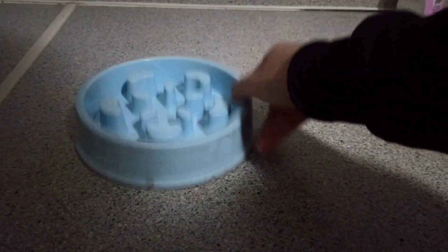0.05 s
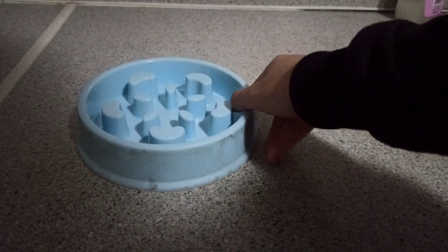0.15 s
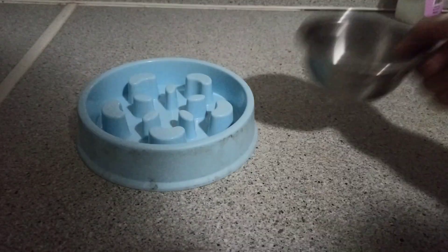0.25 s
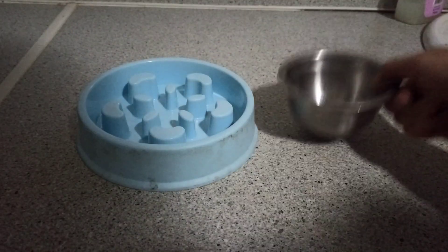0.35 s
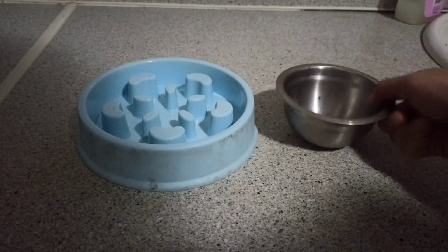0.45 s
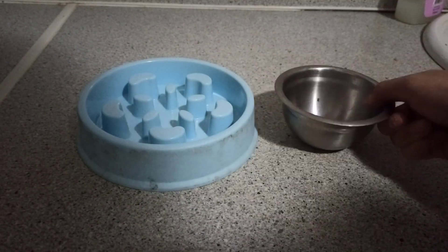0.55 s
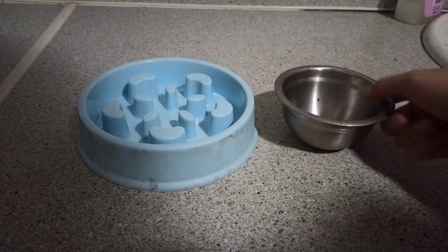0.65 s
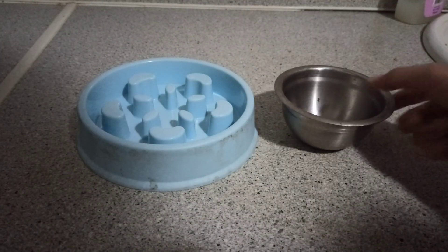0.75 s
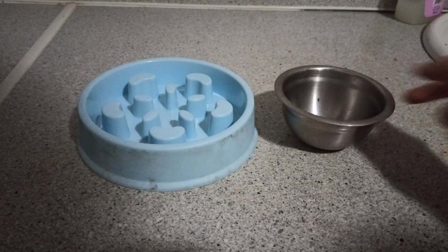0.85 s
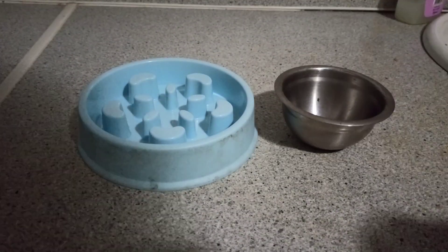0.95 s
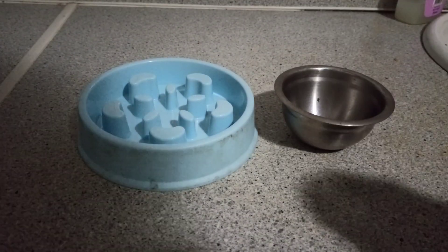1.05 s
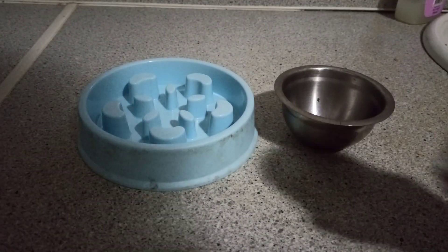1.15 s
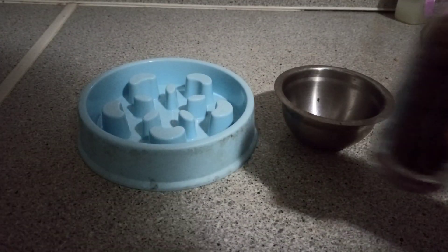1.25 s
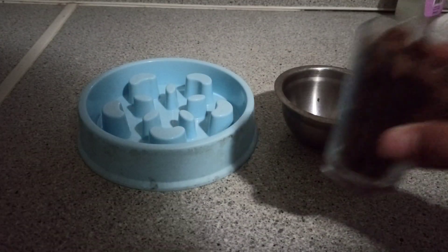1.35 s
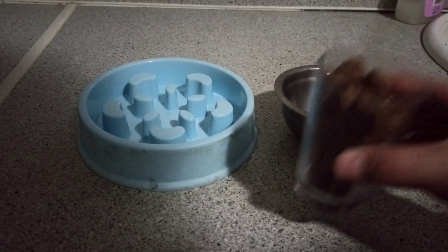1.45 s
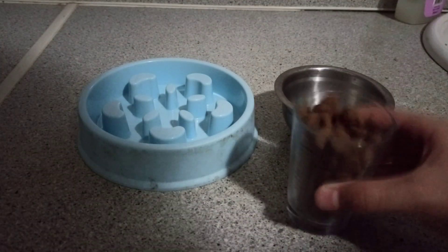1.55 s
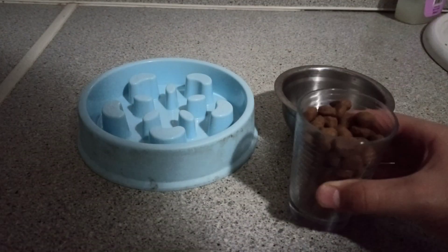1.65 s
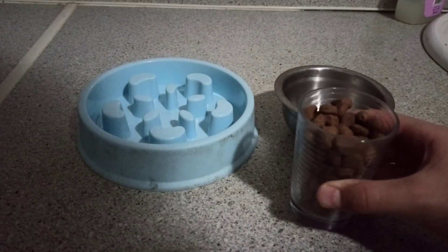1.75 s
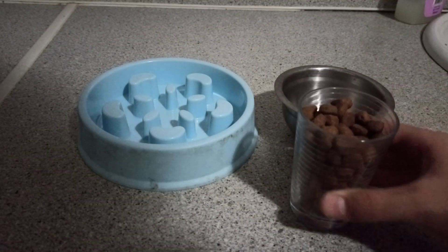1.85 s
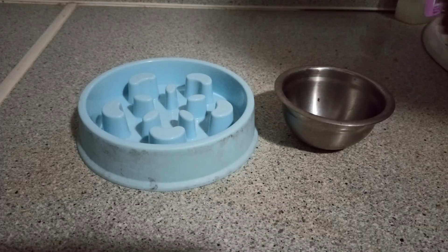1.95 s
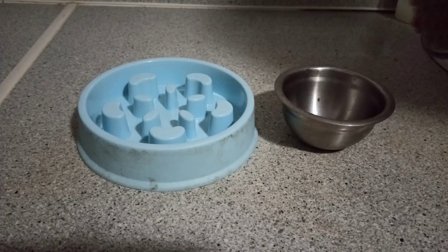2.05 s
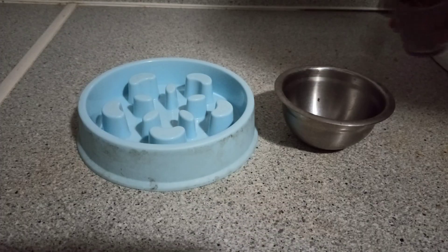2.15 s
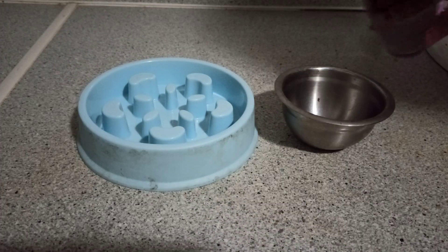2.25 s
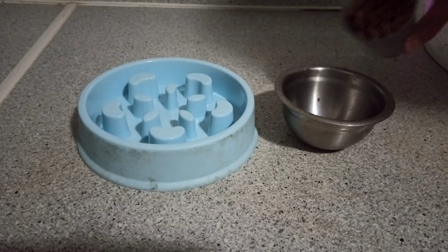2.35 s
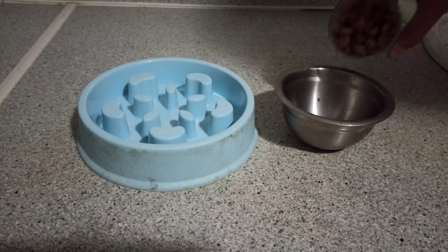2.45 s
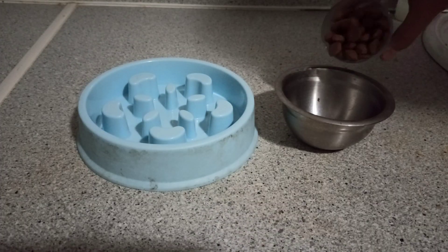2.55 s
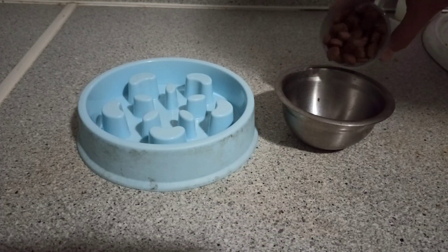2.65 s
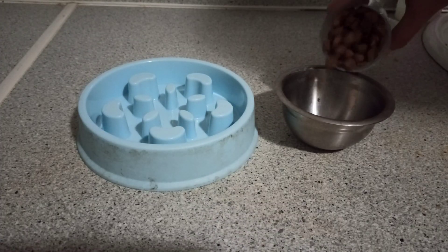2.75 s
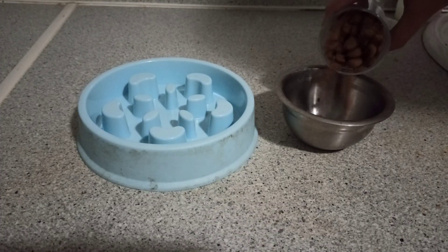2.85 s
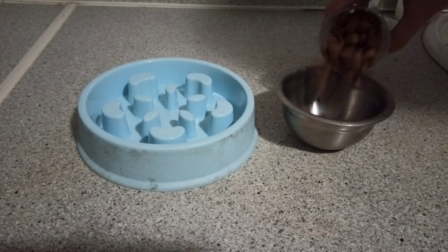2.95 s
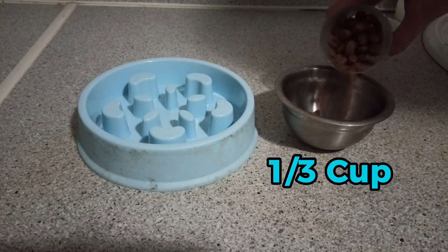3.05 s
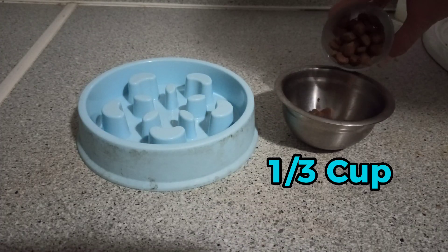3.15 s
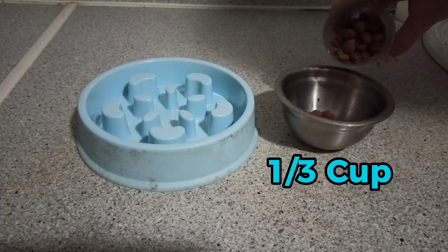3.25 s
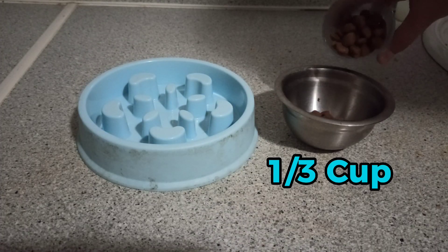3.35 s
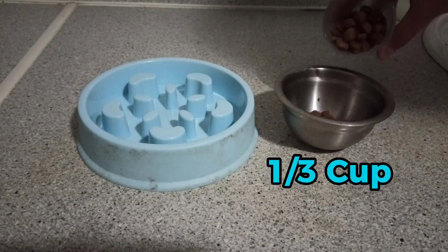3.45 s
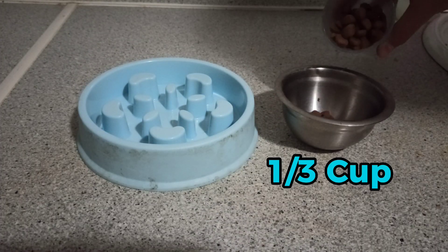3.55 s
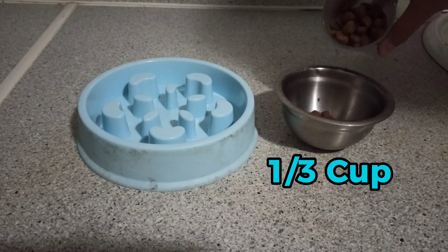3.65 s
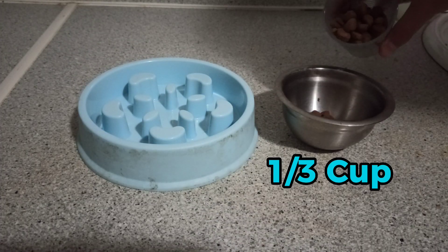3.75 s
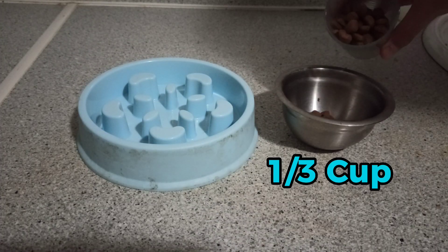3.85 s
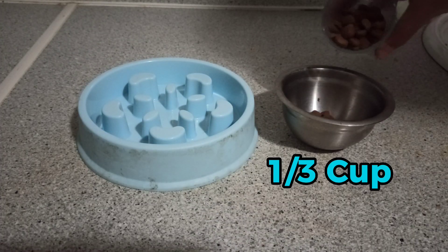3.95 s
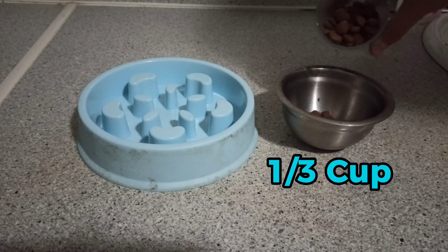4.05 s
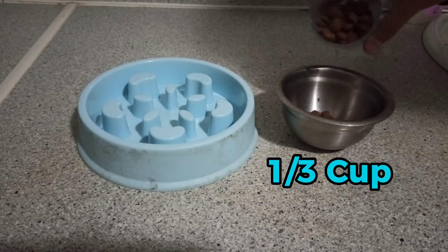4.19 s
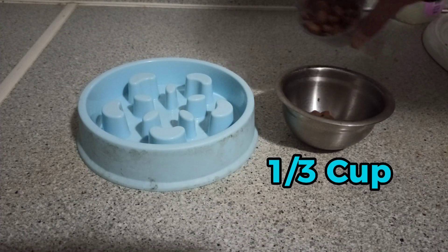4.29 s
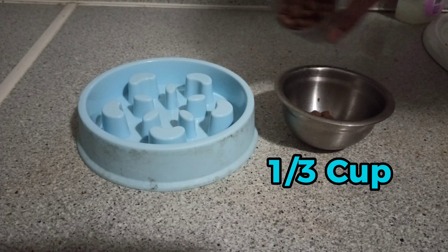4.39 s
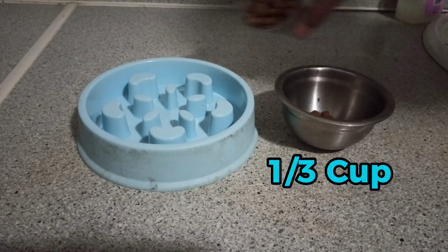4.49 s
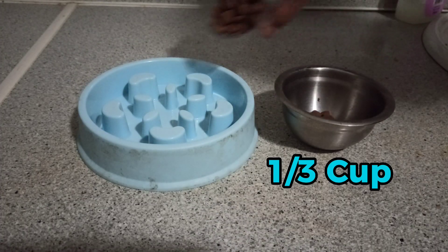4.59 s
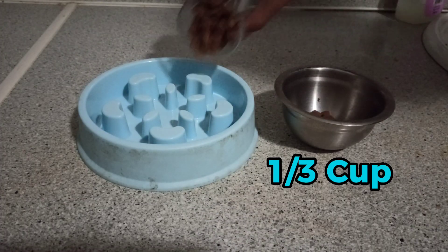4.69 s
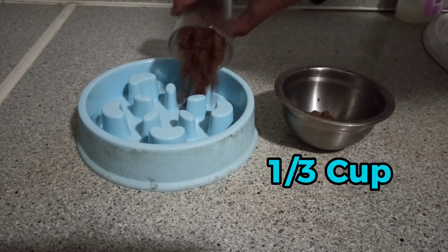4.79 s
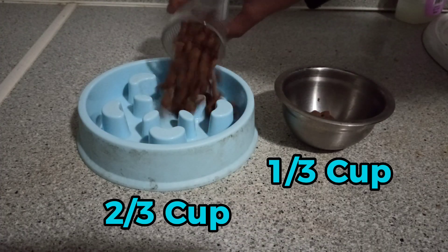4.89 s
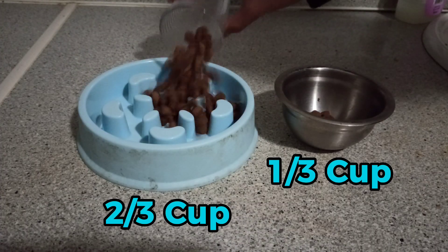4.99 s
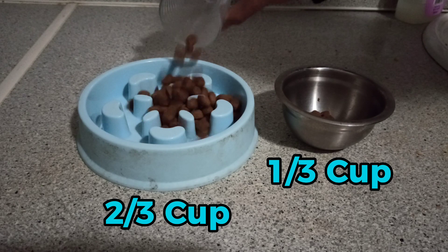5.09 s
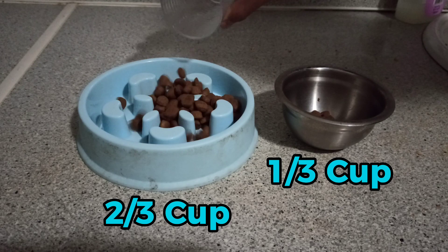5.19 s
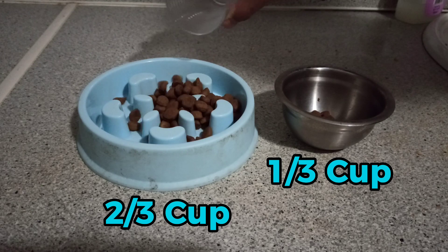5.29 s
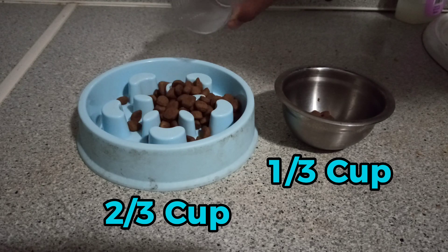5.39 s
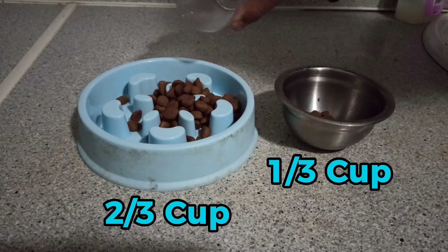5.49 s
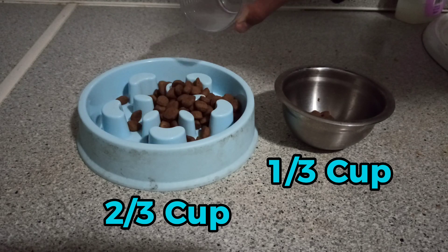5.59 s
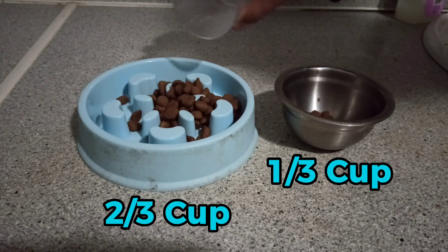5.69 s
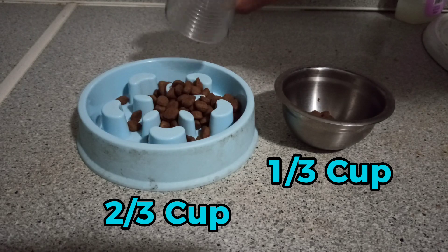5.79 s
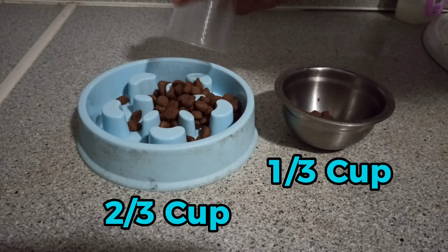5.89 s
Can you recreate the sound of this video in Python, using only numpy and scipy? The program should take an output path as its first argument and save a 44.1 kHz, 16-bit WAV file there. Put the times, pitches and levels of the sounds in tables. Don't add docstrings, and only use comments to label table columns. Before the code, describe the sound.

Close stereo view of a hard, echoing kitchen with a low appliance hum. A plastic bowl clacks down, abruptly cut; a steel bowl lands with a ringing double knock; a full glass thuds. After a few faint ticks, dry pellets clatter brightly into the steel, pause, then pour densely over hollow plastic and settle.

```python
import sys
import numpy as np
from scipy import signal
from scipy.io import wavfile
from scipy.ndimage import uniform_filter1d

SR = 44100
rng = np.random.default_rng(int(sys.argv[2]) if len(sys.argv) > 2 else 0)


def persist_wave(psi):
    counts = np.round(np.clip(psi, -1, 1) * 32767).astype(np.int16)
    wavfile.write(sys.argv[1], SR, np.atleast_2d(counts).T)


def volts_from_decibels(level):
    exponent = np.asarray(level, float) / 20
    return 10 ** exponent


N = 261513

# [f/Hz, t60/s, echo level/dB, left-right likeness]
ROOM = [(100, 0.79, -14.5, 0.7), (238, 0.62, -7.5, 0.61), (534, 0.43, 2, 0.65), (1010, 0.38, -2.5, 0.75),
        (1800, 0.4, -5, 0.025), (3800, 0.37, -2, 0.06), (7760, 0.41, -3, 0.032), (13800, 0.22, -4.5, 0.05)]


def colour(x, low_hz, high_hz):
    return signal.sosfilt(signal.butter(2, [low_hz, high_hz], "band", fs=SR, output="sos"), x)


def rms_one(x):
    return x / np.sqrt(np.mean(x ** 2) + 1e-20)


def at_hz(table, hz, order=1):
    columns = np.array(table)
    return np.interp(np.log(hz), np.log(columns[:, 0]), columns[:, order])


def bands(length):
    edges_hz = 25 * 2 ** np.arange(0, 9.4, 1 / 3)
    white = rng.standard_normal((2, 2, length))
    for k, (low_hz, high_hz) in enumerate(zip(edges_hz, edges_hz[1:])):
        mid, side = colour(white[k % 2], low_hz, high_hz)
        hz = np.sqrt(low_hz * high_hz)
        alike = np.clip(at_hz(ROOM, hz, order=3), -1, 1)
        yield hz, np.sqrt(1 + alike) * mid + np.sqrt(1 - alike) * side * [[1], [-1]]


def ring(clicks, hz, t60_s):
    r, w = volts_from_decibels(-60 / (t60_s * SR)), 2 * np.pi * hz / SR
    return signal.lfilter([0, np.sin(w)], [1, -2 * r * np.cos(w), r * r], clicks + 1e-18)


def blows(rows, colour_db):
    bright_share = (0, .25, .75, 1)
    s, dull_db, bright_db, pan_db = np.transpose(rows)
    db = dull_db[:, None] + np.outer(bright_db - dull_db, bright_share) + np.asarray(colour_db)
    return np.column_stack([s, db, pan_db])


def pellets(rows, colour_db):
    rows = np.asarray(rows, float)
    return np.column_stack([rows[:, 0], rows[:, [1, 1, 2, 3]] + np.asarray(colour_db), rows[:, 4]])


def patter(curve, spread_db, colour_db, width_db):
    s, per_s, level_db = np.transpose(curve)
    t = np.arange(round(s[0] * SR), round(s[-1] * SR)) / SR
    happens = rng.random(len(t)) < np.interp(t, s, per_s) / SR
    bigness = np.minimum(rng.exponential(1, len(t)), 4)
    luck = rng.standard_normal((len(t), 5))
    db = np.interp(t, s, level_db) + spread_db * bigness
    band_db = db[:, None] + np.asarray(colour_db) + 5.6 * luck[:, :4]
    return np.column_stack([t, band_db, width_db * luck[:, 4]])[happens]


def strike(rows, modes, gain_db, crack_db, crack_ms, scatter_db, lag_ms, dull_db=0, firm=False):
    centre_hz = (400, 1200, 3000, 6300)
    crack_edges_hz = np.array([150, 700, 2000, 4500, 16000])
    rows = np.asarray(rows, float)
    start = round(rows[:, 0].min() * SR)
    span = min(N - start, round((np.ptp(rows[:, 0]) + 1.2) * SR))
    at = np.round(rows[:, 0] * SR).astype(int) - start
    pan = volts_from_decibels(np.outer([.5, -.5], rows[:, 5]))
    luck = rng.standard_normal((len(rows), len(modes), 2))
    sound = np.zeros((2, span))
    for k, (hz, level_db, t60_s) in enumerate(modes):
        place = np.interp(np.log(hz), np.log(centre_hz), np.arange(4))
        share = np.maximum(1 - np.abs(place - np.arange(4)), 0)
        sign = -(-1) ** k if firm else np.sign(luck[:, k, 1])
        strength = volts_from_decibels(rows[:, 1:5] @ share + level_db + scatter_db * luck[:, k, 0])
        clicks = np.zeros((2, span))
        clicks[:, at] = pan * strength * sign
        sound += ring(clicks, hz, t60_s)
    fade = np.exp(-1000 / (crack_ms * SR))
    rise = np.exp(-1000 / (.3 * SR))
    poles = np.convolve([1, -fade], [1, -rise])
    mid, side = rng.choice([-1., 1.], (2, span))
    grit = mid + 1.2 * side * [[1], [-1]]
    for k, (low_hz, high_hz) in enumerate(zip(crack_edges_hz, crack_edges_hz[1:])):
        clicks = np.zeros((2, span))
        clicks[:, at] = pan * volts_from_decibels(rows[:, k + 1] + crack_db + dull_db * (k < 2))
        envelope = signal.lfilter([1 - rise], poles, clicks + 1e-18)
        sound += colour(envelope * grit, low_hz, high_hz) * np.sqrt(SR / 2 / (high_hz - low_hz))
    out = np.zeros((2, N))
    out[:, start:start + span] = volts_from_decibels(gain_db) * sound
    out[0] = np.interp(np.arange(N) - lag_ms * SR / 1000, np.arange(N), out[0])
    return out


def lull(hz):
    spell = np.exp(-((np.arange(N) / SR - 4.3) / 0.27) ** 2)
    return -9 * np.exp(-np.log2(hz / 720) ** 2) * spell


def hum():
    # [f/Hz, density/dB per Hz]
    rumble = [(30, -33), (70, -22), (110, -16.5), (200, -20.5), (300, -19), (450, -24), (700, -16.5),
              (930, -23.5), (1050, -33), (2000, -37.5), (4200, -40), (5000, -47.5), (7000, -40),
              (13000, -38.5)]
    # [f/Hz, rms level/dB]
    motors = [(98.2, -57), (100.1, -84)]
    # [f/Hz, width/Hz, level/dB]
    whines = [(194.5, 22, -67.5), (278.3, 31, -71), (285, 18, -66.5), (337.4, 20, -66), (400, 14, -73),
              (496, 8.7, -65.5), (662, 79, -66), (1120, 2.9, -74), (1910, 8.5, -83.5), (2130, 32, -77),
              (3035, 15, -81.5), (4070, 610, -75.5), (6350, 290, -79)]
    rush = 0
    for hz, noise in bands(N):
        slack_db = lull(hz) if 300 < hz < 1600 else 0
        rush = rush + noise * volts_from_decibels(at_hz(rumble, hz) + slack_db)
    out = volts_from_decibels(-54.5) * rms_one(rush)
    for hz, level_db in motors:
        drone = np.sqrt(2) * np.sin(2 * np.pi * hz * np.arange(N) / SR)
        out = out + volts_from_decibels(level_db + np.array([[.8], [-.8]])) * drone
    for hz, width_hz, level_db in whines:
        r = np.exp(-np.pi * width_hz / SR)
        poles = [1, -2 * r * np.cos(2 * np.pi * hz / SR), r * r]
        once = signal.lfilter([1, 0, -1], poles, rng.standard_normal((2, N)))
        mid, side = signal.lfilter([1, 0, -1], poles, once)
        out = out + volts_from_decibels(level_db) * rms_one(mid + 0.23 * side * [[1], [-1]])
    return out


def knock(x):
    return colour(x, 130, 19000)


def plastic_down():
    # [t/s, thud/dB, clack/dB, tick/dB, left-right/dB]
    touches = [
        (0.0135, -17, -15, -11, 1),
        (0.0640, -36, -35, -34.5, 0.32),
    ]
    # [t/s, contacts per s, level/dB]
    roll = [
        (0.025, 300, -44),
        (0.07, 300, -41.5),
        (0.1, 300, -53.5),
        (0.126, 300, -32.5),
    ]
    # [t/s, thud/dB, clack/dB, tick/dB, left-right/dB]
    landing = [
        (0.1282, -18, -10.5, -11.5, 3.5),
        (0.1308, -21.5, -23, -14.5, 2),
        (0.1396, -25.5, -11, -22, -3),
        (0.1478, -30, -34.5, -32, -3),
    ]
    landing_db = (0.073, 0.1, 0.1, 0.078)
    # [f/Hz, level/dB, t60/s]
    edge_modes = [(362, -14, 0.1), (640, -5, 0.024), (887, 7, 0.021), (773, -12, .06), (1187, -9, .02),
                  (1820, -14, .006), (2700, -19, .008), (3130, -5, 0.017), (3910, -7, .008),
                  (4500, -8.5, 0.0086), (6200, -10, 0.016), (7500, -12.5, .01)]
    # [f/Hz, level/dB, t60/s]
    base_modes = [(260, -14.5, 0.076), (358, -14, 0.05), (558, 1, 0.031), (625, -9, 0.024),
                  (738, 3.5, 0.024), (1040, -1, 0.014), (1302, -3.5, 0.024), (1700, 0.5, 0.013),
                  (2640, -17.5, 0.0048), (3510, -25, .006), (4570, -32.5, .004), (6760, -14.5, 0.012),
                  (7560, -22.5, 0.008)]
    out = strike(pellets(touches, [0, 0, 0, 0]), edge_modes, 0, crack_db=1.5, crack_ms=0.49,
                 scatter_db=2.5, lag_ms=0.024, dull_db=-12.5, firm=True)
    out += strike(patter(roll, 2.75, [-10.5, 6.5, -8.5, 4], 3.3), edge_modes, 0, crack_db=-11,
                  crack_ms=1.0, scatter_db=5.0, lag_ms=0.1)
    out += strike(pellets(landing, landing_db), base_modes, 0, crack_db=-11.5, crack_ms=0.85,
                  scatter_db=5.0, lag_ms=-0.13, dull_db=4, firm=True)
    return knock(out)


def steel_down():
    # [t/s, dull/dB, bright/dB, left-right/dB]
    landing = [
        (0.435, -18.5, -21, 0.93),
        (0.4888, -19.5, -27, 0.13),
    ]
    landing_db = (-2.5, 14.5, -19.5, -2.5)
    # [f/Hz, level/dB, t60/s]
    base_modes = [(170, -9.5, .12), (258, -6.5, .14), (340, -6.5, .05), (465, -19, 0.015),
                  (641, 0.5, 0.0098), (750, -8.5, 0.032), (953, -11, 0.0089), (1270, 5, 0.0078),
                  (1520, -6.5, 0.0051), (2430, -3.5, 0.005), (3180, 20, .005), (6800, -17.5, .08),
                  (7610, -20, 0.072)]
    # [f/Hz, level/dB, t60/s]
    wall_rings = [(4545, -14, .2), (4656, 3, .36), (4680, 2, .22), (4718, 1, .22), (4752, -3, .14)]
    return knock(strike(blows(landing, landing_db), base_modes + wall_rings, 2.8, crack_db=7.5,
                        crack_ms=0.76, scatter_db=1, lag_ms=0.03, dull_db=-14, firm=True))


def glass_down():
    # [t/s, dull/dB, bright/dB, left-right/dB]
    landing = [
        (1.5976, -16, -13, 0.97),
    ]
    landing_db = (0.083, 0.1, 0.1, 0.1)
    # [f/Hz, level/dB, t60/s]
    base_modes = [(140.4, -18, 0.41), (185, -12, 0.092), (300, -12, 0.061), (426, -11, 0.02),
                  (735, -4.5, 0.026), (1050, 1.5, 0.01), (1460, 0.5, 0.013), (1920, 1.5, 0.0087),
                  (2430, -4, 0.012), (3610, -10.5, 0.006), (6400, -8.5, 0.009)]
    return knock(strike(blows(landing, landing_db), base_modes, 5.46, crack_db=-3, crack_ms=1.1,
                        scatter_db=5, lag_ms=0.066, dull_db=-7.5, firm=True))


def glass_pellets():
    # [t/s, dull/dB, bright/dB, left-right/dB]
    ticks = [
        (1.8083, -80, -66, -4),
        (1.8582, -84, -58.5, 2),
        (2.49, -75, -43, 0),
        (2.5208, -74, -66, -16),
        (2.8089, -53.5, -54, 0),
        (2.8537, -69.5, -48, -6),
    ]
    tick_db = (-12, -8, -1.5, -2)
    # [t/s, contacts per s, level/dB]
    slide = [
        (4.77, 704, -84),
        (4.805, 705, -75.5),
        (4.835, 704, -64.5),
        (4.85, 710, -68),
    ]
    # [f/Hz, level/dB, t60/s]
    wall_modes = [(2750, -14, 0.08), (2785, 3, 0.03), (3940, -16, .02), (6600, -22, .15), (6210, -6, .06),
                  (6260, 1, 0.035), (6840, -22, 0.032)]
    out = strike(blows(ticks, tick_db), wall_modes, 10.6, crack_db=-5.5, crack_ms=1.4,
                 scatter_db=-3.0, lag_ms=0.12)
    return out + strike(patter(slide, 2.3, [-15, -25.5, -0.5, -0.5], 2.0), wall_modes, 13.0,
                        crack_db=-19, crack_ms=1.2, scatter_db=2.0, lag_ms=0.12)


def steel_pour():
    # [t/s, thud/dB, clack/dB, tick/dB, left-right/dB]
    clear = [(2.8808, -19, -24, -11, -3), (2.884, -32.5, -35, -25.5, -9), (2.9261, -30.5, -20.5, -22, -4),
             (2.9347, -45.5, -22.5, -29.5, -0.5), (2.9646, -29.5, -42, -46, 0), (2.9831, -23, -16, -18, -1),
             (2.9909, -38, -25, -31, 2), (2.9988, -46, -25, -21, 1), (3.0039, -30, -25, -24.5, -3),
             (3.0114, -47, -25, -49, -4), (3.0167, -36.5, -29, -38, 0), (3.0224, -53.5, -44, -34, 5),
             (3.0525, -35.5, -54, -40.5, -5), (3.0886, -36, -33, -37, 9), (3.0967, -56, -27, -24.5, -12),
             (3.1045, -37, -31, -31, 22), (3.1162, -40, -22.5, -16, 1), (3.1223, -25.5, -20, -29, -3),
             (3.1384, -55.5, -37, -42, 1), (3.1468, -29.5, -32, -38, 5), (3.1633, -31.5, -29, -48, -1),
             (3.1724, -46, -43, -45, 8), (3.1925, -39, -44, -53, -1), (3.2015, -54, -53, -39, 2),
             (3.2393, -36, -33, -32.5, 0), (3.257, -38, -34, -46, 6), (3.284, -45, -45, -40.5, -6),
             (3.3849, -39, -39, -40.5, 3), (3.4021, -57, -59, -68, -2)]
    clear_db = (-2.5, 6, -2.5, 3)
    # [t/s, contacts per s, level/dB]
    small = [
        (2.88, 540, -68),
        (2.928, 350, -60),
        (3.004, 370, -43),
        (3.052, 450, -50),
        (3.114, 380, -39),
        (3.45, 440, -61.5),
    ]
    # [f/Hz, level/dB, t60/s]
    clank = [(630, -6.5, .015), (1230, -5.5, 0.013), (1880, -20.5, .01), (2407, -7, .02),
             (2626, -10, 0.0222), (2900, -3, 0.044), (3325, -5, 0.017), (4250, -12.5, .025),
             (4725, 3.5, .014), (6450, -11, .012), (8290, 1, .035)]
    # [f/Hz, level/dB, t60/s]
    rings = [(4533, -10, .05), (4617, -10, .07), (4638, -9, .09), (4677, -7, .06), (6718, -13, .18),
             (7011, -16, .06), (7404, -12, .17), (7607, -9, .19)]
    filled_s, empty_shine_db, filled_ring = 2.9, 3, .35
    rows = pellets(clear, clear_db)
    bare = [(hz, db + empty_shine_db * (hz > 7500), t60_s) for hz, db, t60_s in clank + rings]
    loaded = [(hz, db, min(t60_s, .02 + filled_ring * t60_s)) for hz, db, t60_s in clank + rings]
    out = strike(rows[rows[:, 0] < filled_s], bare, -2.0, crack_db=5.5, crack_ms=0.61,
                 scatter_db=2.5, lag_ms=0.09, dull_db=-17.5)
    out += strike(rows[rows[:, 0] >= filled_s], loaded, 1.75, crack_db=2.5, crack_ms=1.08,
                  scatter_db=1.5, lag_ms=0.038, dull_db=-5.5)
    return out + strike(patter(small, 1.7, [4.5, -9.0, -11, -27], 3.2), loaded, 1.45,
                        crack_db=-10.5, crack_ms=0.44, scatter_db=2.0, lag_ms=0.032)


def rim_pings():
    # [t/s, dull/dB, bright/dB, left-right/dB]
    pings = [
        (3.163, -39, -62.5, -7),
        (3.181, -80, -36.5, -10),
    ]
    ping_db = (-8, 6.5, 7.5, -7.5)
    # [f/Hz, level/dB, t60/s]
    rim_modes = [(1115.5, -2, 1.5), (1123.5, -3, 1.5), (2997, -1.5, .95)]
    return strike(blows(pings, ping_db), rim_modes, 0, crack_db=-25, crack_ms=1.5, scatter_db=0, lag_ms=.3)


def plastic_pour():
    # [t/s, thud/dB, clack/dB, tick/dB, left-right/dB]
    pour = [(4.8488, -12.5, -13.5, -31.5, 1.5), (4.8555, -14, -15.5, -12.5, 6.5),
            (4.8636, -47, -38, -15.5, 0), (4.8708, -33, -27, -33.5, -1), (4.8893, -12, -9, -25, 4),
            (4.8978, -16.5, -24.5, -17, 1.5), (4.9041, -26, -31, -44, -1), (4.9112, -38.5, -38, -36, 3.5),
            (4.9168, -16, -16, -35.5, 3.5), (4.9256, -20, -10.5, -16.5, -8), (4.9337, -22.5, -37, -20, 7),
            (4.9383, -34, -25, -44, 3.5), (4.9452, -20.5, -19, -27.5, 10), (4.9503, -16.5, -15, -24.5, 3),
            (4.9607, -15, -32, -26, -4), (4.9653, -20.5, -31, -19.5, 13), (4.9778, -17, -23, -42, -4),
            (4.9895, -18.5, -17, -19, 6.5), (4.9956, -19, -32.5, -11, 2), (5.0027, -21, -23, -12, 5),
            (5.0106, -10, -38, -28, 3), (5.0309, -19, -30, -39, 8), (5.0388, -19, -33, -39, 12),
            (5.0524, -26, -23.5, -44, 10), (5.0669, -16.5, -32, -37, 6), (5.0743, -25, -24, -37, -4),
            (5.0805, -23, -39, -38, -10), (5.0852, -37, -36, -36, 10), (5.0932, -18.5, -24, -26, -7),
            (5.099, -11.5, -12.5, -16, 4.5),
            (5.1063, -36, -28, -20, -3), (5.1126, -35, -22, -42, 5), (5.1182, -20, -32, -40, 2),
                (5.1288, -35, -39, -45, -6), (5.1367, -29, -40, -45, 5), (5.144, -26, -20.5, -21, 3),
                (5.1527, -15, -21.5, -41, 0), (5.1595, -18.5, -44, -42, -2), (5.1654, -28, -41, -29, 9),
                (5.1818, -15.5, -14.5, -32, 0), (5.1896, -19, -20.5, -18, -1), (5.2003, -45, -26, -34, 1),
                (5.2124, -24, -9.5, -15.5, 3), (5.2218, -18.5, -17, -15, -2), (5.2282, -20.5, -23, -35, 3),
                (5.237, -35, -36, -40, 5), (5.2607, -25, -45, -46, 1), (5.273, -18, -20.5, -23, -3),
                (5.276, -28, -17, -28, 3), (5.288, -20.5, -40, -40, 0), (5.3021, -26.5, -20.5, -27.5, 3.5),
                (5.3127, -43, -53, -59, -2), (5.3348, -35, -49, -53, -2), (5.343, -35, -52, -52, 4)]
    pour_db = (-15.5, -5, -0.5, 5.5)
    # [t/s, contacts per s, level/dB]
    small = [
        (4.85, 900, -31.5),
        (4.896, 900, -30),
        (5.018, 900, -27),
        (5.076, 900, -32.5),
        (5.152, 900, -35.5),
        (5.29, 900, -38.5),
        (5.35, 900, -57),
        (5.448, 900, -75),
        (5.53, 900, -88),
    ]
    # [f/Hz, level/dB, t60/s]
    wall_modes = [(265, -7.5, 0.035), (365, 0.5, 0.075), (461, 1, 0.091), (517, -1, 0.099),
                  (590, -13.5, 0.0083), (750, 4.5, 0.021), (900, -1, 0.014), (1260, 1, 0.0079),
                  (1390, -4.5, 0.03), (1706, 4, 0.015), (2080, -4, 0.0096), (2700, -9, 0.0052),
                  (2930, -14, 0.013), (3170, -0.5, 0.011), (3950, -1, 0.0087), (4140, -8.5, 0.0067),
                  (5330, -16, 0.0031), (6400, -1.5, 0.0045), (7550, -2.5, 0.0041)]
    out = strike(pellets(pour, pour_db), wall_modes, -0.98, crack_db=3.0, crack_ms=1.0,
                 scatter_db=3.0, lag_ms=-0.11, dull_db=-4)
    return out + strike(patter(small, 2.5, [-24, -12.5, -9.0, -7.0], 1.7), wall_modes, 1.8,
                        crack_db=4.0, crack_ms=0.58, scatter_db=3.0, lag_ms=-0.12)


def last_pellets():
    # [t/s, thud/dB, clack/dB, tick/dB, left-right/dB]
    drops = [
        (5.361, -33.5, -44, -44, 2),
        (5.3968, -38.5, -33, -29, 3.5),
        (5.418, -36, -41, -41, 3),
        (5.4476, -37, -39, -43, -0.5),
        (5.4578, -42, -47, -41.5, 7),
        (5.4675, -47, -51, -56, 0),
        (5.4775, -43.5, -56, -56, 0),
        (5.489, -42.5, -64, -60, 1),
    ]
    # [t/s, contacts per s, level/dB]
    rocking = [
        (5.3, 300, -37),
        (5.39, 300, -58),
        (5.42, 300, -46),
        (5.45, 300, -61),
        (5.5, 300, -75),
    ]
    # [f/Hz, level/dB, t60/s]
    rib_modes = [(556, -4.5, 0.019), (820, 3.5, 0.015), (1110, 3, 0.009), (2780, -3.5, 0.016),
                 (2990, -0.5, 0.017), (3220, -1, 0.02), (3580, -9, 0.014), (4400, -9, .008)]
    out = strike(pellets(drops, [0, 0, 0, 0]), rib_modes, 0.5, crack_db=6, crack_ms=0.7,
                 scatter_db=-2.0, lag_ms=-0.057, dull_db=-9)
    return out + strike(patter(rocking, 3.9, [-19, -9, -3.0, -16], 2.5), rib_modes, -2.3,
                        crack_db=-6, crack_ms=1.1, scatter_db=3.5, lag_ms=-0.071)


def kitchen(x, wet_db):
    t = np.arange(round(.9 * SR)) / SR
    field = 0
    for hz, noise in bands(len(t)):
        field = field + noise * volts_from_decibels(at_hz(ROOM, hz, order=2) - 60 * t / at_hz(ROOM, hz))
    early = 1 + 0.97 * (rng.random(len(t)) < 400 / SR) * np.exp(-t / 0.09)
    field = field * early * (1 - np.exp(-(t / 0.0011) ** 2))
    return volts_from_decibels(wet_db) * signal.fftconvolve(colour(x, 100, 17000), field, axes=1)[:, :N]


def splices():
    # [cut t/s, gap/s, depth/dB, fade-in time constant/s, next take level/dB]
    cuts = [
        (0.291, 0.005, -28, 0.0096, 1),
        (0.923, 0.043, -38, 0.26, 1),
        (1.989, 0.0066, -13, 0.015, -0.5),
    ]
    t = np.arange(N) / SR
    gain = volts_from_decibels(8 - 18 * t)
    for s, gap_s, depth_db, fade_s, take_db in cuts:
        rising = 1 - (1 - volts_from_decibels(depth_db)) * np.exp(-np.maximum(t - s - gap_s, 0) / fade_s)
        over = np.clip((t - s) / .004 + .5, 0, 1)
        gain = (1 - over) * gain + over * rising * volts_from_decibels(take_db)
    return gain


def scene():
    t = np.arange(N) / SR
    first = plastic_down()
    first += kitchen(first, wet_db=-33.5)
    first_cut = np.clip((0.296 - t) / 0.0034, 0, 1)
    down = steel_down() + glass_down()
    steel = colour(colour(glass_pellets() + steel_pour(), 320, 13000), 250, 19500)
    plastic = colour(plastic_pour() + last_pellets(), 225, 8700)
    echoes = kitchen(volts_from_decibels(2.0) * down + volts_from_decibels(-2.0) * steel + volts_from_decibels(-4.5) * plastic, wet_db=-31.5)
    dry = first * first_cut + down + steel + rim_pings() + plastic + echoes + hum()
    return dry * splices()


def lead_in(x, level_db, lead_ms):
    t = np.arange(1024) / SR
    swell = np.exp(-1000 * t[::-1] / lead_ms) / np.sqrt(lead_ms * SR / 2000)
    noisy_swell = rng.standard_normal(1024) * swell
    early = signal.oaconvolve(x, noisy_swell[None], axes=1)[:, 1024:1024 + N]
    return volts_from_decibels(level_db) * np.pad(early, ((0, 0), (0, 1)))


def tattered(x, loud_db, share, hole_db):
    spells = np.arange(N) // 1024
    loud = uniform_filter1d(np.mean(x ** 2, axis=0), size=1024) > volts_from_decibels(loud_db) ** 2
    out = 0
    for low_hz in np.arange(11600, 15600, 500):
        hole = loud & (rng.random(spells[-1] + 1) < share)[spells]
        band = signal.butter(4, [low_hz, low_hz + 500], "band", fs=SR, output="sos")
        gain = uniform_filter1d(np.where(hole, volts_from_decibels(hole_db), 1.), size=256)
        out = out + signal.sosfilt(band, x) * gain
    return out


def sudden(x, jump_db):
    power = np.mean(x ** 2, axis=0)
    before = np.roll(uniform_filter1d(power, size=1024), 700)
    jumps = uniform_filter1d(power, size=128) > volts_from_decibels(jump_db) ** 2 * before
    return uniform_filter1d(1. * jumps, size=128)


def top_cut(x):
    return signal.sosfilt(signal.butter(12, 16640, fs=SR, output="sos"), x)


def record(dry):
    dry = .9 * np.tanh(dry / .95)
    dry = dry + lead_in(dry, level_db=-24, lead_ms=4.0)
    dry = dry - 0.14 * colour(dry, 4650, 6250)
    body = signal.sosfilt(signal.cheby2(16, 60, 8930, fs=SR, output="sos"), dry)
    treble_power = uniform_filter1d(colour(dry, 4000, 8400) ** 2, size=700)
    sheen = np.sqrt(treble_power + 1e-14) * rng.standard_normal(dry.shape)
    air = tattered(dry + volts_from_decibels(-4.5) * sheen, loud_db=-46, share=.4, hole_db=-22)
    attack = sudden(colour(dry, 4100, 8400), jump_db=16.0)
    gap_band = (volts_from_decibels(-65.0) + volts_from_decibels(-14.5) * attack) * colour(dry, 8400, 12000)
    x = body + volts_from_decibels(-10.0) * air + gap_band
    x = signal.sosfilt(signal.butter(2, 55, "high", fs=SR, output="sos"), x)
    x = signal.sosfilt(signal.cheby2(10, 60, 16700, fs=SR, output="sos"), x)
    return top_cut(np.clip(x, -.88, .88))


dry = scene()
out = record(dry)
persist_wave(out)
```